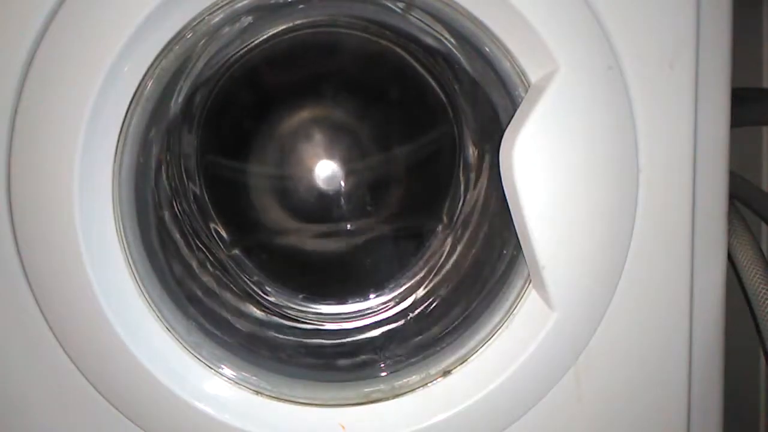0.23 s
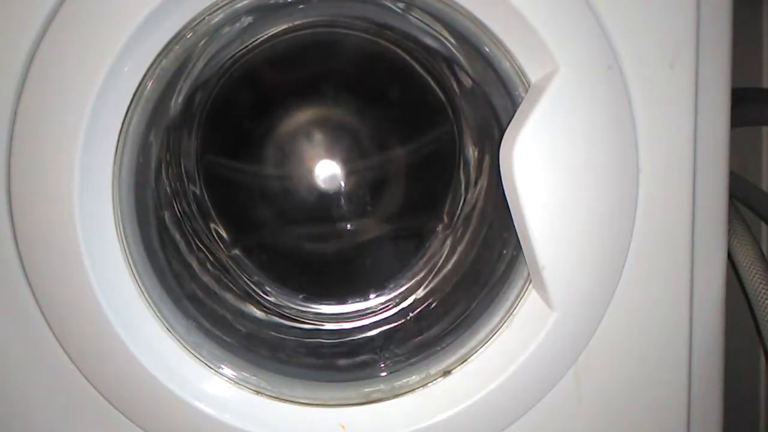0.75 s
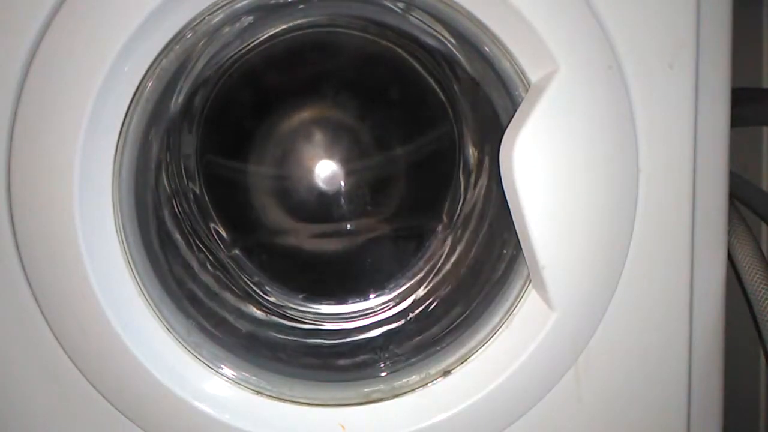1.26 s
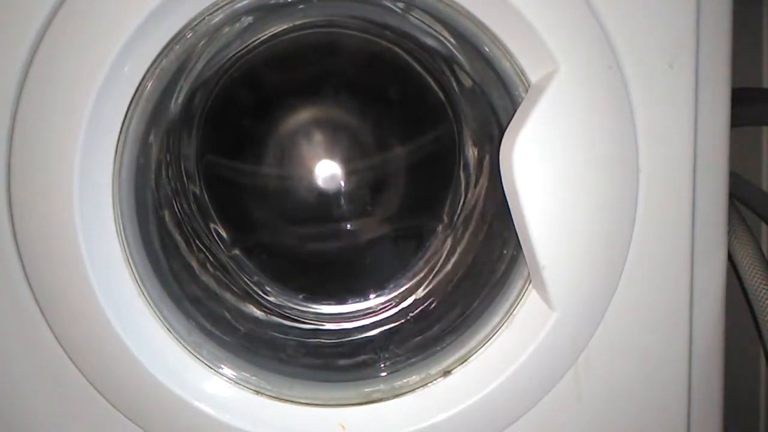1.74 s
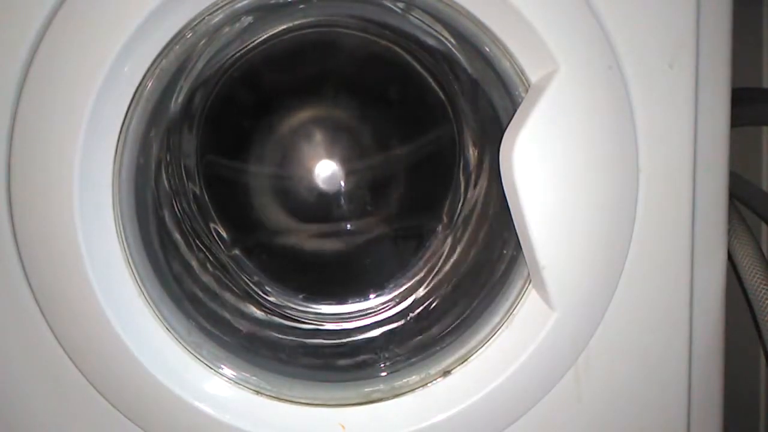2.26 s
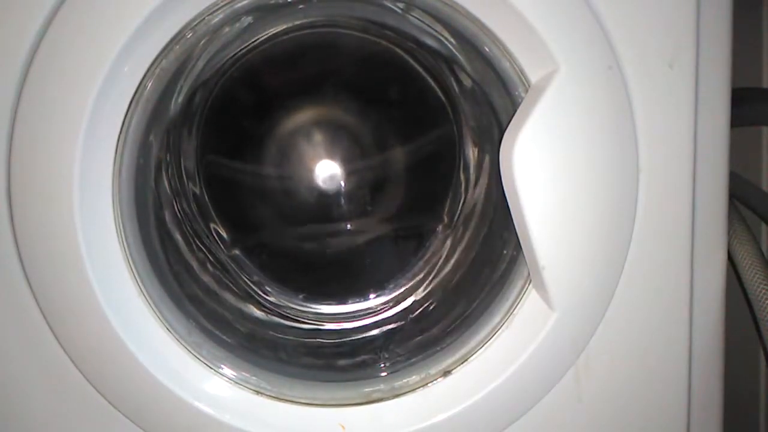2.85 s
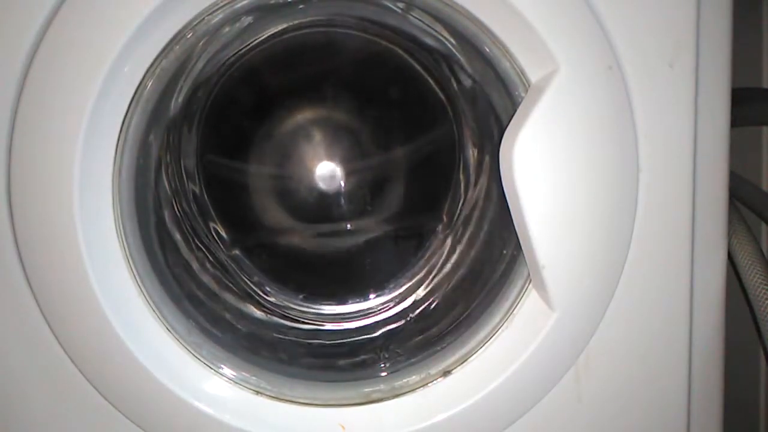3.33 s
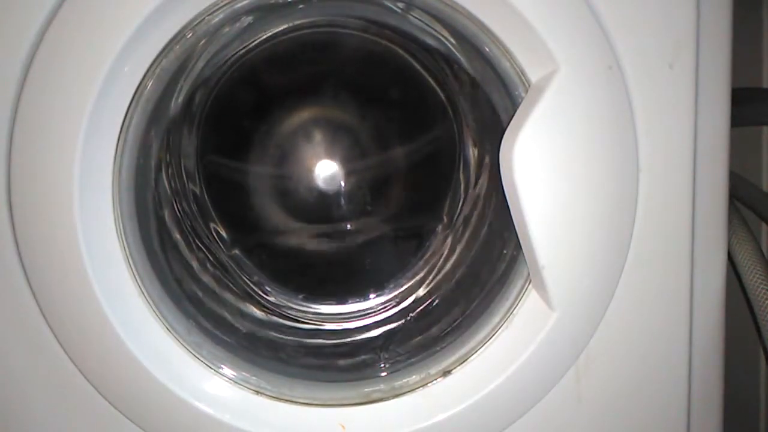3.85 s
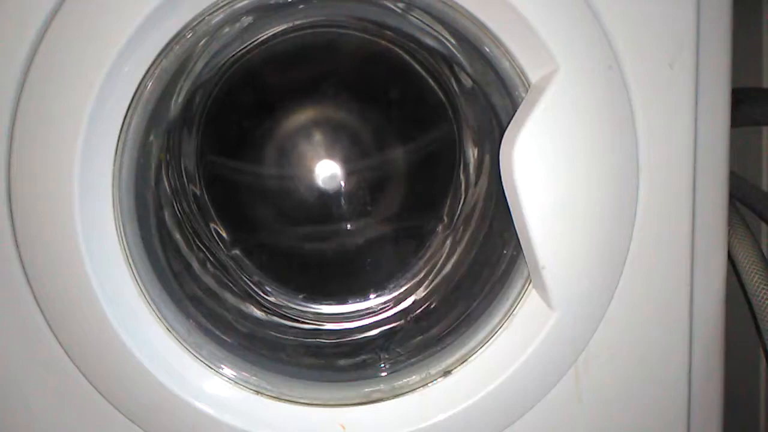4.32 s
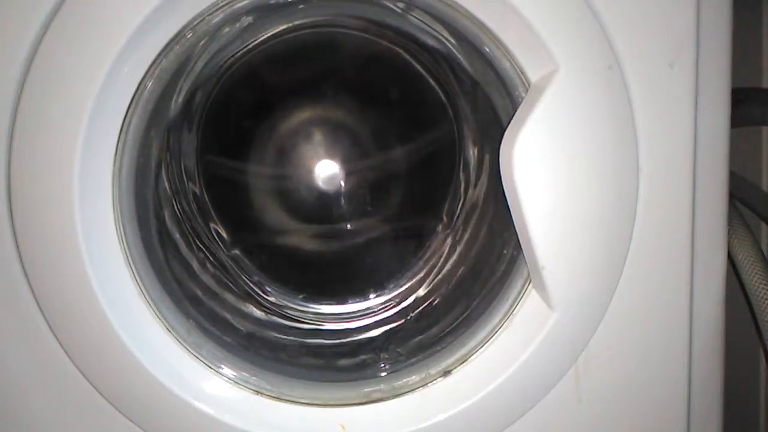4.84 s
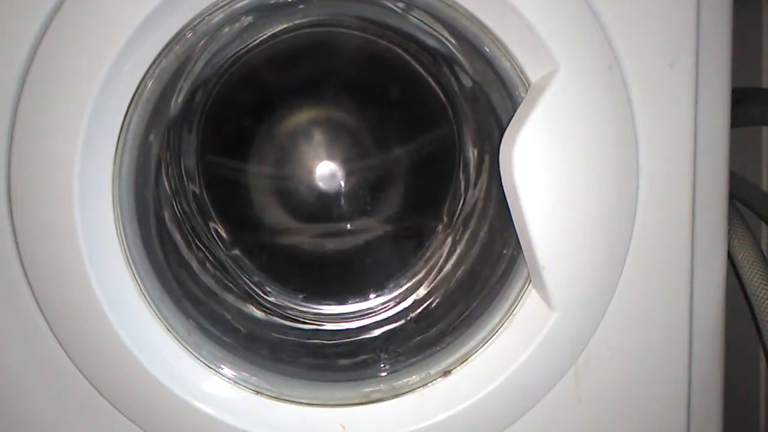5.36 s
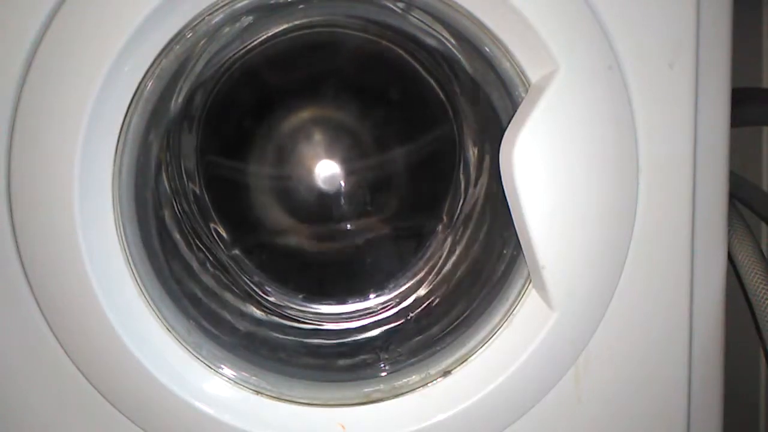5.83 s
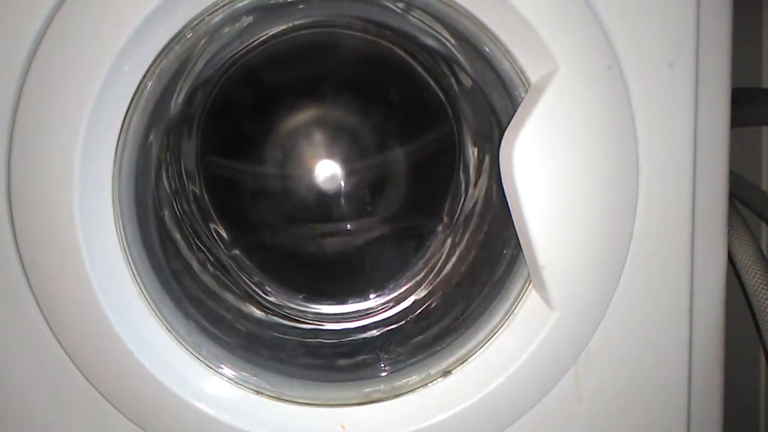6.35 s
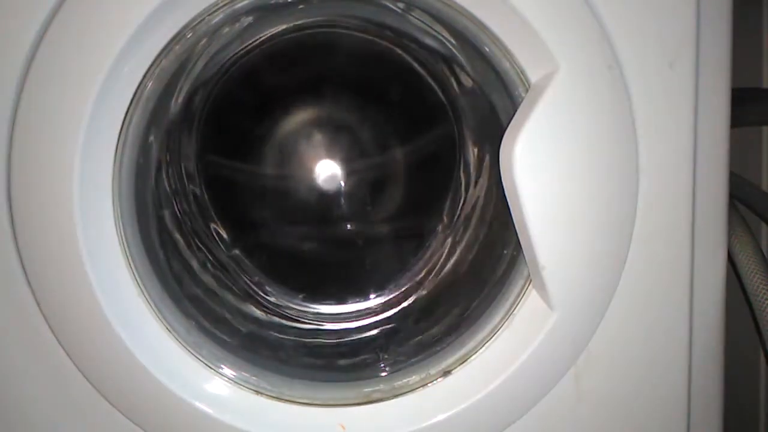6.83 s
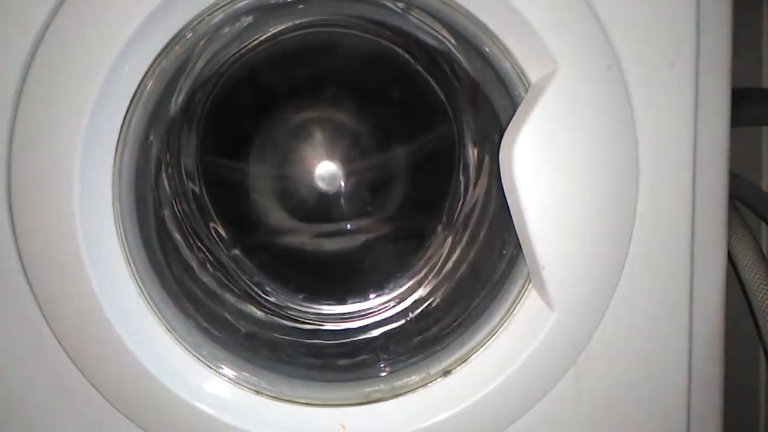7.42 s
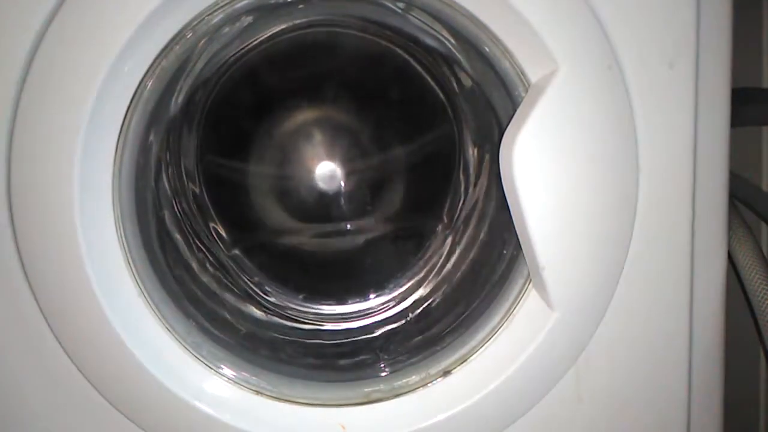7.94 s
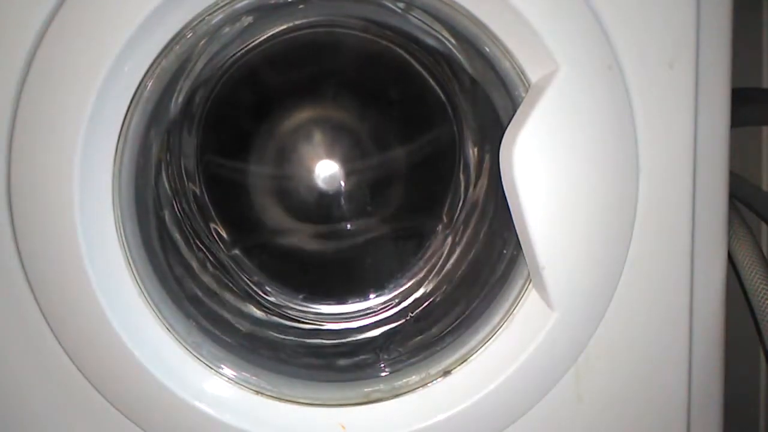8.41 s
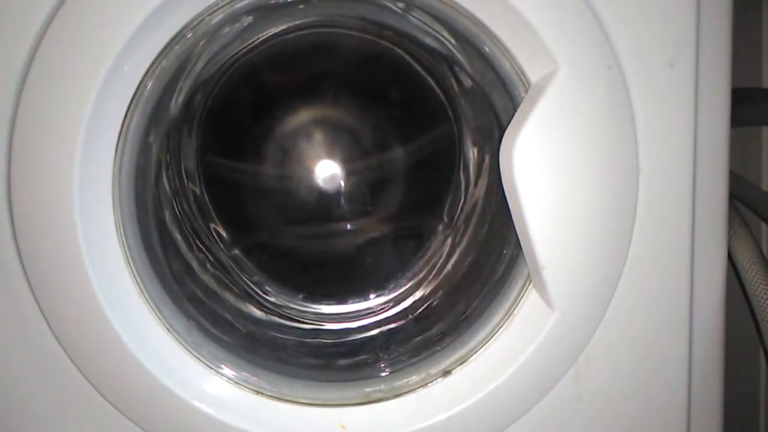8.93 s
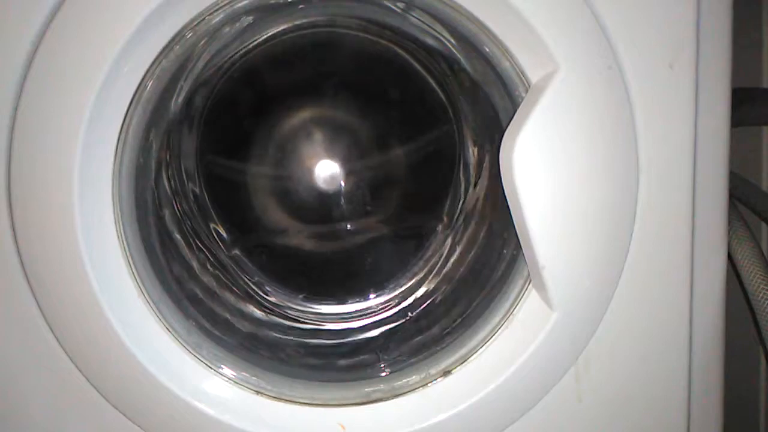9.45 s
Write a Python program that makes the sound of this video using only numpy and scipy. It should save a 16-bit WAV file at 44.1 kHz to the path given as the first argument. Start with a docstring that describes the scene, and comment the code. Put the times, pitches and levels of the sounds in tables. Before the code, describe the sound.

A front-loading washing machine spins fast and steadily, with deep throbbing rumble, low motor hum, thin high electric whine and soft hiss, heard up close.

```python
"""A brushed motor whines in a spinning front-loading washing machine, heard in stereo close to its door.
The whine is commutator tones at multiples of the shaft speed; the unbalanced drum makes it throb.
In rough spells it changes timbre; in brief swells a narrow noise buzzes beside it. The brushes hiss with
weak tones. Drum, shaft and mains give fairly steady tones, the bearings restless ones; a few squeaky pips
sound, and shaped noise makes a low rumble, the shaking cabinet and a whirr of soft noise."""
import sys
import numpy as np
from scipy import signal
from scipy.fft import rfft, irfft, next_fast_len
from scipy.io import wavfile
from scipy.ndimage import uniform_filter1d, map_coordinates

SR = 44100
rng = np.random.default_rng(int(sys.argv[2]) if len(sys.argv) > 2 else 0)


def log_audio(samples):
    """Write samples as a 16-bit WAV file to the path given in sys.argv[1]."""
    # one column per channel
    frames = np.atleast_2d(samples).T
    # limit to full scale, then quantise
    limited = np.clip(frames, -1, 1)
    pcm = np.round(limited * 32767).astype(np.int16)
    wavfile.write(sys.argv[1], SR, pcm)


N = 426888
TOP_HZ = 14250  # band limit of the whole sound


def amp(db):
    """Decibels to gain."""
    return 10 ** (np.asarray(db) / 20)


def seconds():
    """Time of every sample."""
    return np.arange(N) / SR


def along(points, hz):
    """Each column after the first, read between its points on a log axis."""
    f, *columns = np.transpose(points)
    return np.array([np.interp(np.log(hz + 1), np.log(f + 1), column) for column in columns])


def curve(points):
    """A (time, value) table drawn as straight lines, one value per sample."""
    times, values = np.transpose(points)
    return np.interp(seconds(), times, values)


def wobble(rate):
    """A smooth random curve, rate knots a second."""
    knots = rng.standard_normal(int(N * rate / SR) + 4)
    coarse = np.arange(0, N + 64, 64)  # samples; a spline here, straight lines between
    smooth = map_coordinates(knots, [coarse * rate / SR])
    return np.interp(np.arange(N), coarse[:len(smooth)], smooth)


def filtered(x, response):
    """x times a complex response of frequency; both ends are mirrored so that they do not ring."""
    pad = 4096  # samples
    x = np.pad(x, [(0, 0), (pad, pad)], "reflect")
    size = next_fast_len(x.shape[1])
    spectrum = rfft(x, size) * response(np.fft.rfftfreq(size, 1 / SR))
    return irfft(spectrum, size)[:, pad:pad + N]


# how alike the two sides of the noise are: (f/Hz, likeness 0-1)
SIDE_LIKENESS = [(60, 1), (280, 1), (400, 0.88), (500, 0.52), (720, 0.95), (850, 0.04), (1500, 0.14),
                 (5000, 0.034)]
# how far the left side of the noise runs ahead: (f/Hz, left lead/rad)
SIDE_LEAD = [(60, 0), (200, 0.3), (380, 1.13), (460, 0.23), (800, 0.04), (1000, 1.5), (1500, 3)]


def noise(spectrum):
    """Stereo noise, partly shared by both sides, next to silent outside its spectrum."""
    lowest, highest = spectrum[0][0], spectrum[-1][0]
    spectrum = [(.999 * lowest, -150, -150), *spectrum, (1.001 * highest, -150, -150)]

    def shared_and_opposed(hz):
        turn = np.arccos(np.clip(along(SIDE_LIKENESS, hz)[0], 0, 1)) / 2
        return np.array([np.cos(turn), np.sin(turn)])

    def color(hz):
        lead = np.exp(.5j * along(SIDE_LEAD, hz) * [[1], [-1]])
        return np.sqrt(SR / 2) * amp(along(spectrum, hz)) * lead  # dB per Hz to gain of white noise

    shared, opposed = filtered(rng.standard_normal((2, N)), shared_and_opposed)
    return filtered(np.array([shared + opposed, shared - opposed]), color)


def tone(angle, left_db, right_db, lead):
    """A complex stereo tone whose real part has the given rms levels, at a chance starting phase."""
    sides = np.sqrt(2) * amp([[left_db], [right_db]])
    sides = sides * np.exp(.5j * lead * np.array([[1], [-1]]))
    return sides * np.exp(1j * (angle + rng.uniform(0, 2 * np.pi)))


def series(angle, rows, drift_db, rate):
    """Tones at multiples of a rotation, each drifting in level on its own."""
    total = np.zeros((2, N))
    for multiple, left_db, right_db, lead in rows:
        total += amp(drift_db * wobble(rate)) * tone(multiple * angle, left_db, right_db, lead).real
    return total


# color of the low rumble before it is evened out: (f/Hz, left level/dB per Hz, right level/dB per Hz)
RUMBLE_COLOR = [(3, -54, -45), (8, -45, -45), (12.5, -42, -41), (18.8, -41, -42.5), (25.2, -27.5, -26.5),
                (30, -28, -27.5), (35.7, -31, -30.5), (43.8, -36.5, -40), (55.6, -56, -54)]
# level of the low rumble, rms averaged over both sides: (t/s, level/dB)
RUMBLE_LEVEL = [(0, -19), (.3, -14), (.75, -20), (1.2, -15), (1.45, -18), (1.72, -13.5), (2.0, -18.5),
                (2.3, -13), (2.65, -19), (3.05, -10), (3.55, -22.5), (3.9, -17), (4.35, -18), (4.6, -17.5),
                (4.9, -21), (5.2, -13.5), (5.5, -18), (6.2, -14), (6.55, -17), (6.9, -18), (7.3, -15),
                (7.9, -19.5), (8.2, -17), (8.62, -20), (8.85, -12), (9.15, -17), (9.4, -14), (9.68, -22)]
EVENING_S = 0.196  # the noise is evened out over this time before the level curve shapes it


def rumble():
    """Low rumble noise, evened out in power, whose level follows a typed curve."""
    low = noise(RUMBLE_COLOR)
    power = np.abs(uniform_filter1d(np.mean(low ** 2, axis=0), int(EVENING_S * SR)))
    return amp(curve(RUMBLE_LEVEL)) * low / np.sqrt(power + 1e-9)


# resonant bands of the cabinet: (f/Hz, left level/dB per Hz, right level/dB per Hz)
CABINET_COLOR = [(55, -53, -50), (67, -45.5, -45), (73.6, -53, -55), (82, -43.5, -42), (107.4, -56, -57.5),
                 (122, -47.5, -50), (149, -51, -44.5), (162, -55, -49), (174, -57, -52.5), (255, -55, -51),
                 (275.7, -53, -52), (308, -64.5, -62), (321.7, -53, -50.5), (333.3, -52, -49.5),
                 (349, -58.5, -56.5), (378, -61, -64), (408, -58.5, -60.5), (465, -64, -64),
                 (534, -64.5, -64), (586, -62, -82), (593, -60.5, -63.5), (700, -70, -65), (784, -59, -65),
                 (860, -67.5, -70), (956.5, -78.5, -67.5)]
# the whirr above them, before its gain changes: (f/Hz, left level/dB per Hz, right level/dB per Hz)
WHIRR_COLOR = [(1050, -73, -71), (1170, -71.5, -71), (1250, -74, -73.5), (1300, -73, -73), (1400, -76, -77),
               (1550, -80, -81), (1800, -83, -83), (1980, -80, -80), (2150, -85, -83), (2300, -87, -83),
               (2650, -85, -81), (2900, -88, -86), (3180, -87, -85), (3360, -83, -77), (3660, -88, -89),
               (3950, -88, -84), (4220, -89, -80), (4350, -93, -87)]
# brush hiss, before its flutter; its first row also ends the whirr:
# (f/Hz, left level/dB per Hz, right level/dB per Hz)
HISS_COLOR = [(4600, -93, -91), (5000, -94, -91), (5150, -96, -97), (5400, -93, -95), (6200, -94, -97),
              (6700, -90, -91), (7400, -98, -97), (7900, -94, -91), (9000, -94, -90), (10500, -97, -89),
              (11500, -97, -88), (12600, -96, -89), (13300, -97, -90), (14100, -107, -95)]


def cabinet():
    """Broad shaking of the cabinet: steady noise in resonant bands up to where the whirr begins."""
    return noise(CABINET_COLOR + WHIRR_COLOR[:1])


GRAIN_DB = 2.2  # depth of the small gain changes


def grained(x):
    """x with small random gain changes over time and frequency, some ten ms by some hundred Hz."""
    bins = signal.stft(x, nperseg=512)[2]
    field = rng.standard_normal(bins.shape[1:])
    field = uniform_filter1d(field, size=3, axis=0)  # across frequency
    field = uniform_filter1d(field, size=6, axis=1)  # across time
    # the second term offsets the loudness that the gain changes add
    gain = amp(GRAIN_DB * (field / field.std() - GRAIN_DB / 8.7))
    return signal.istft(bins * gain, nperseg=512)[1][:, :N]


def whirr(drum, contact_db):
    """Soft noise that partly follows the brush level and sways with the drum."""
    level_db = 0.27 * contact_db + 0.73 * wobble(9) + 0.29 * np.sin(drum)
    return amp(level_db) * grained(noise(WHIRR_COLOR + HISS_COLOR[:1]))


# magnetic hum, before drift: (multiple of mains, left level/dB, right level/dB, left lead/rad)
HUM_TONES = [(2, -36, -34, 0.2), (4, -43, -40, 0.1), (6, -50, -43, 0.1), (10, -53, -63, -0.5),
             (11, -50, -57, -0.4), (14, -53, -57, 0.5), (15, -54, -58, 0.2)]
MAINS_HZ = 50.07


def hum():
    """Magnetic hum: slowly drifting tones at multiples of the mains frequency."""
    return series(2 * np.pi * MAINS_HZ * seconds(), HUM_TONES, drift_db=2.5, rate=2.44)


# the drum and its bearing, before drift: (multiple of drum speed, left level/dB, right level/dB, left lead/rad)
DRUM_TONES = [(1, -12, -11, -0.0), (3, -41, -42, -0.0), (4, -39, -38, -0.0), (5, -38, -37, -0.0),
              (7, -47, -46, -0.0), (8, -42, -40, 0.0), (8.8, -38, -38, -0.1), (10, -44, -43, -0.0),
              (12, -45, -42, -0.2), (13.28, -46, -44, -0.1), (45, -53, -52, 0.1), (48, -54, -54, 0.0),
              (49.05, -49, -56, -0.6), (88.67, -64, -67, 2.8)]


def drum_tones(drum):
    """The turning drum and its bearing give nearly steady tones at multiples of the drum speed."""
    return series(drum, DRUM_TONES, drift_db=0.13, rate=2.31)


# pulley and bearings, between the shaft's multiples, before drift:
# (multiple of shaft speed, left level/dB, right level/dB, left lead/rad)
BEARING_TONES = [(7.191, -58, -57, 1.1), (10.789, -71, -78, 0.1), (20.68, -76, -71, 0),
                 (21.59, -76, -71, 0), (12.859, -75, -72, -0.4), (13.414, -82, -73, 0.5),
                 (13.984, -77, -66.5, -1.2), (14.148, -74, -69, 3.1), (14.297, -76, -64, -2.6),
                 (14.383, -68, -65, 2.3), (14.469, -71, -71, 1.8), (20.305, -75, -77, -0.1),
                 (35.57, -81, -75, 0.0), (15.43, -77, -75, 0)]


def bearings(shaft):
    """Pulley and bearings give restless tones at broken multiples of the shaft speed."""
    return series(shaft, BEARING_TONES, drift_db=4.5, rate=11)


# rotor unbalance, before drift: (multiple of shaft speed, left level/dB, right level/dB, left lead/rad)
ROTOR_TONES = [(1, -20, -18, -.2), (2, -46, -44, .2), (3, -43, -49, 1.9)]


def rotor(shaft, drum):
    """The unbalanced rotor hums at the shaft's multiples, swaying slightly with each drum turn."""
    return series(shaft, ROTOR_TONES, drift_db=-0.06, rate=4.4) * (1 + 0.033 * np.sin(drum))


# pips of a brief chirp in the works, before their roughness:
# (center t/s, f/Hz, peak level/dB, Gaussian length t/s)
SQUEAK_PIPS = [(8.881, 4150, -54, .004), (8.892, 4700, -50, .003), (8.897, 4400, -49, .003),
               (8.908, 5150, -59, .007), (8.925, 4200, -59, .015)]


def squeak():
    """Short rough sine pips under Gaussian envelopes, a little different on each side."""
    t = seconds()
    total = np.zeros((2, N))
    for center, hz, db, length in SQUEAK_PIPS:
        pip = amp(db) * np.exp(-.5 * ((t - center) / length) ** 2) * np.sin(2 * np.pi * hz * t)
        roughening = 1.4 + .6 * np.array([wobble(500), wobble(500)])
        total += pip * roughening
    return total


# level of the brush noise, which whine and whirr follow in part: (t/s, level/dB)
BRUSH_LEVEL = [(0.0, 0), (0.6, 1.5), (1.1, 0.5), (1.6, 1.5), (2.2, 0), (2.65, 0), (3.0, -1.5), (3.7, 1),
               (4.3, 0), (4.8, 1), (5.1, -1), (5.75, -3), (6.5, -1.5), (7.4, 0), (8.35, 1.5), (8.75, 1),
               (9.05, 1.5), (9.68, -.5)]


def brush_contact():
    """Brush level in dB over time, from the contact between brush and commutator."""
    return curve(BRUSH_LEVEL)


# main whines, before their level changes: (multiple of shaft speed, left level/dB, right level/dB, left lead/rad)
WHINE_TONES = [(18, -64, -58, -1.0), (36, -58, -61, -1.5), (49, -69, -57, 2.1), (54, -67, -57, .4),
               (72, -78, -68, -1.4)]
# weak tones of uneven commutator bars, before flutter and drift:
# (multiple of shaft speed, left level/dB, right level/dB, left lead/rad)
BAR_TONES = [(11, -76, -77, 0), (12, -78, -78, 0), (13, -70, -71, -0.5), (14, -75, -64, -1.2),
             (19, -67, -69, 2.6), (21, -71, -69, -0.1), (22, -77, -70, 1.2), (20, -78, -75, 0),
             (23, -78, -62.5, -0.7), (24, -76, -72, 0), (31, -75, -81, -.5), (32, -74, -87, -.6),
             (35, -71, -84, 2.5), (41, -75, -81, .4), (53, -80, -74, 2.9), (60, -94, -71, -2.6),
             (61, -92, -72, 2.2), (62, -91, -72, 0.6), (69, -84, -69, 2.1), (71, -88, -75, -1.1),
             (73, -88, -73, 2.0)]
# mean level of the remaining multiples, before scatter: (multiple of shaft speed, left level/dB, right level/dB)
FAINT_LEVELS = [(11, -78, -76), (24, -83, -80), (33, -82, -88), (45, -84, -81), (55, -88, -78),
                (75, -94, -77)]
FAINT_SCATTER_DB = 5.5


def faint_bars():
    """Rows for the multiples without a strong tone: levels scatter, sides unrelated."""
    multiples = np.arange(FAINT_LEVELS[0][0], FAINT_LEVELS[-1][0] + 1)
    multiples = np.setdiff1d(multiples, [row[0] for row in BAR_TONES + WHINE_TONES])
    scatter_db = FAINT_SCATTER_DB * rng.standard_normal((len(multiples), 2)).T
    levels_db = along(FAINT_LEVELS, multiples) + scatter_db
    return list(zip(multiples, *levels_db, rng.uniform(-np.pi, np.pi, len(multiples))))


def brushes(shaft, drum, contact_db):
    """Brush hiss and weak bar tones follow the contact, flutter, and throb with the drum."""
    flutter = amp(contact_db + 0.33 * wobble(6.8) + 1.14 * wobble(14) + 0.96 * np.sin(drum))
    hiss = noise(HISS_COLOR + [(TOP_HZ, -108, -97)])
    hiss = hiss * (1 + 0.07 * np.sin(2 * shaft))  # both brushes meet the same bump each turn
    return flutter * (hiss + series(shaft, BAR_TONES + faint_bars(), drift_db=2.5, rate=7.7))


# swells shared by buzz and beads: (center t/s, level/dB, Gaussian length t/s)
BUZZ_SWELLS = [(0.2, -12, .06), (0.497, 4, 0.064), (0.8, -3, .07), (1.25, -3, 0.2), (1.72, 6, 0.056),
               (2.2, 5, 0.065), (2.5, 4, 0.17), (2.774, 0, 0.031), (3.05, 1, 0.057), (3.34, 6, 0.11),
               (3.65, 2, 0.07), (4.2, -1, .2), (7.3, -4, .06), (8.95, -1, .08), (9.2, -3, .06),
               (9.417, 2, 0.046), (9.634, 2, 0.033)]


def swells():
    """Strength of the buzz: brief, uneven swells."""
    t = seconds()
    return sum(amp(db) * np.exp(-.5 * ((t - center) / length) ** 2) for center, db, length in BUZZ_SWELLS)


# resonance just above the lowest whine, before the swells: (f/Hz, left level/dB per Hz, right level/dB per Hz)
BUZZ_COLOR = [(3270, -99, -99), (3330, -93, -89), (3355, -90, -80), (3375, -91, -81), (3400, -96, -92)]


def buzz():
    """A resonance sounds as narrow noise that swells along with the beads and wavers quickly."""
    return swells() * amp(1.9 * wobble(17)) * noise(BUZZ_COLOR)


BEAD_TURN = .8  # where in the drum turn the whine flares, 0-1
BEAD_SHARP, BEAD_DB = 2.2, 7  # narrowness; size relative to the plain whine, before swells and wobble


def beads(drum):
    """Complex gain added to the lowest whine: a pulse each drum turn, leaning to the resonance above."""
    angle = drum - 2 * np.pi * BEAD_TURN
    pulse = np.exp(BEAD_SHARP * (np.cos(angle) - 1) + 1j * angle)
    return amp(BEAD_DB + 1.9 * wobble(11)) * swells() * pulse


# spells in which the whine turns rough: (start t/s, end t/s, roughness, about 1 when full)
ROUGH_SPELLS = [(0.35, 4.06, 1.08), (8.9, 11, 0.1)]
ROUGH_TURN_S = 0.44  # time to turn rough or smooth again


def roughness():
    """0 while the whine is smooth, ramping to each spell's own depth inside it."""
    t = seconds()
    total = np.zeros(N)
    for start, end, depth in ROUGH_SPELLS:
        inside = np.minimum(t - start, end - t)
        total += depth * np.clip(inside / ROUGH_TURN_S + .5, 0, 1)
    return total


# how each whine changes: (level/dB per dB of brush level; then per unit of roughness:
# level/dB, sideband level/dB, added phase unrest/rad)
WHINE_CHANGES = [(0.25, -0.5, 0, .2), (1.3, 0, 1, .1), (2.5, -6, 3, .3), (2.6, -2.5, 9.5, .9),
                 (1, 12.5, -2, .35)]
# drum sidebands of each whine, before drift and roughness: (left lower level/dB, left upper level/dB,
# right lower level/dB, right upper level/dB, angle/rad: 0 throbs in level, pi wavers in pitch)
DRUM_SIDEBANDS = [(-22, -21, -22, -15, 0), (-18, -16, -15, -11, 1.8), (-15, -6, -10, -13, -2),
                  (-14, -19, -15, -12, 2.5), (-13, -15, -3, -5, 3)]
JITTER_RAD = 0.18  # phase unrest of a smooth whine, scales a random curve


def whine(shaft, drum, contact_db, rough):
    """Commutator tones; each drum turn rocks the motor, which adds a drifting sideband below and above."""
    total, flares = np.zeros((2, N)), beads(drum)
    for whine_row, change_row, sideband_row in zip(WHINE_TONES, WHINE_CHANGES, DRUM_SIDEBANDS):
        multiple, left_db, right_db, lead = whine_row
        follow, rough_db, rough_side_db, rough_rad = change_row
        *side_db, angle = sideband_row

        rock = np.exp(1j * (drum + rng.uniform(0, 2 * np.pi, (2, 1))))  # own phase on each side
        lower, upper = amp(side_db).reshape(2, 2, 1).swapaxes(0, 1)
        lower = lower * amp(3.5 * wobble(6)) * np.exp(1j * (angle + 0.85 * wobble(2.97)))
        upper = upper * amp(3.8 * wobble(7.7)) * np.exp(.5j * wobble(5))
        throb = 1 + amp(rough_side_db * rough) * (lower / rock + upper * rock)
        if multiple == WHINE_TONES[0][0]:  # only the lowest whine flares
            throb = throb + flares

        level_db = follow * contact_db + rough_db * rough
        level_db = level_db + 0.43 * wobble(4.5) + (1.0 + 0.64 * rough) * wobble(14)
        jitter = (JITTER_RAD + rough_rad * rough) * wobble(23)
        carrier = tone(multiple * shaft + jitter, left_db, right_db, lead)
        total += amp(level_db) * (throb * carrier).real
    return total


# motor speed: (t/s, shaft f/Hz)
SHAFT_SPEED = [(0.0, 185.275), (1.2, 185.357), (2.3, 185.45), (3.0, 185.44), (5.4, 185.14), (6.0, 185.105),
               (7.3, 185.19), (8.8, 185.235), (9.68, 185.22)]
BELT_RATIO = 11.682  # motor turns per drum turn


def rotation():
    """Angles of shaft and drum in radians; the belt ties the drum to the shaft."""
    shaft = 2 * np.pi * np.cumsum(curve(SHAFT_SPEED)) / SR
    return shaft, shaft / BELT_RATIO


def scene():
    """The machine from its rumbling background up to the motor's whine."""
    shaft, drum = rotation()
    contact_db = brush_contact()
    background = rumble() + cabinet() + whirr(drum, contact_db)
    tones = hum() + drum_tones(drum) + bearings(shaft) + rotor(shaft, drum)
    motor = brushes(shaft, drum, contact_db) + buzz() + whine(shaft, drum, contact_db, roughness())
    return background + tones + squeak() + motor


FADE_S = .004  # fade at each end


def record(dry):
    """Loud swings round off gently; both ends fade briefly; nothing is kept above the band limit."""
    soft = dry / (1 + np.abs(dry / 0.91) ** 4) ** (1 / 4)
    to_end = np.minimum(np.arange(N), np.arange(N)[::-1]) / SR
    fade = np.sin(np.pi / 2 * np.clip(to_end / FADE_S, 0, 1)) ** 2
    return filtered(soft * fade, lambda hz: hz < TOP_HZ)


dry = scene()
out = record(dry)
log_audio(out)
```